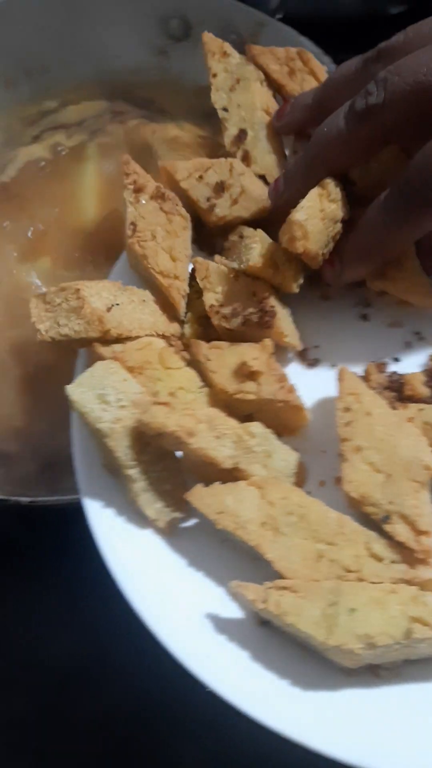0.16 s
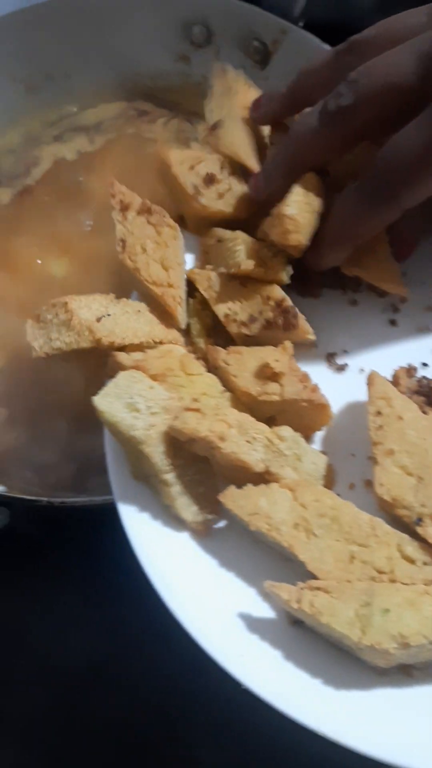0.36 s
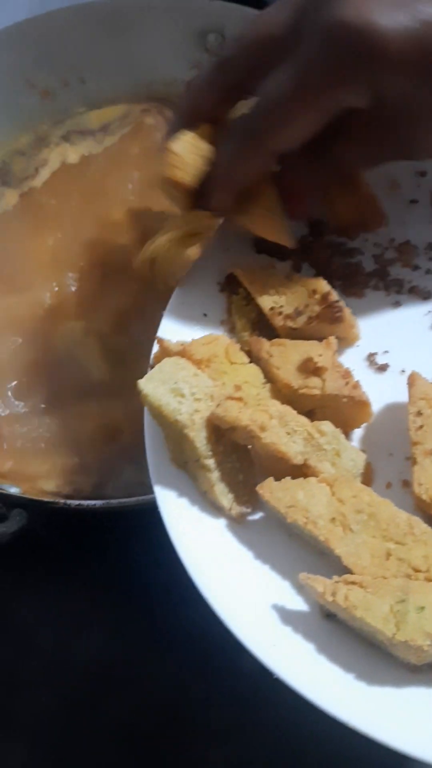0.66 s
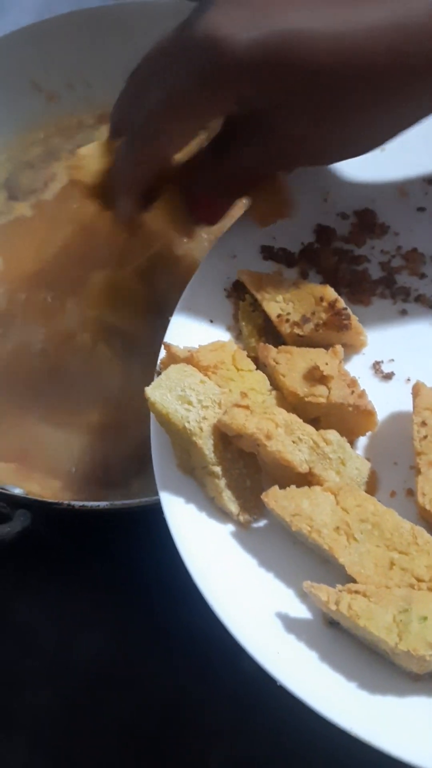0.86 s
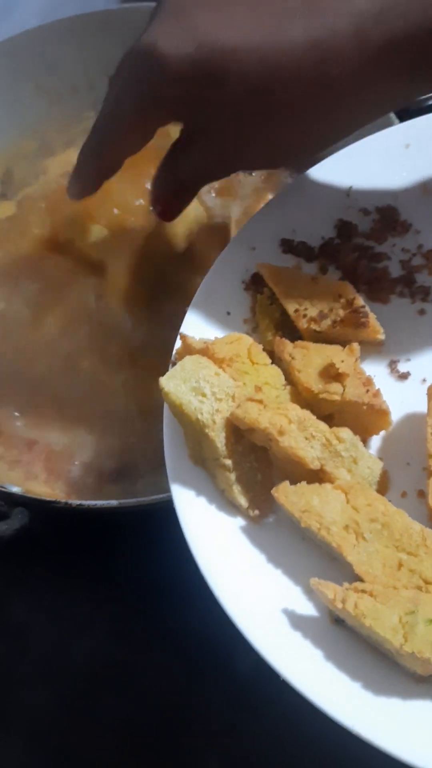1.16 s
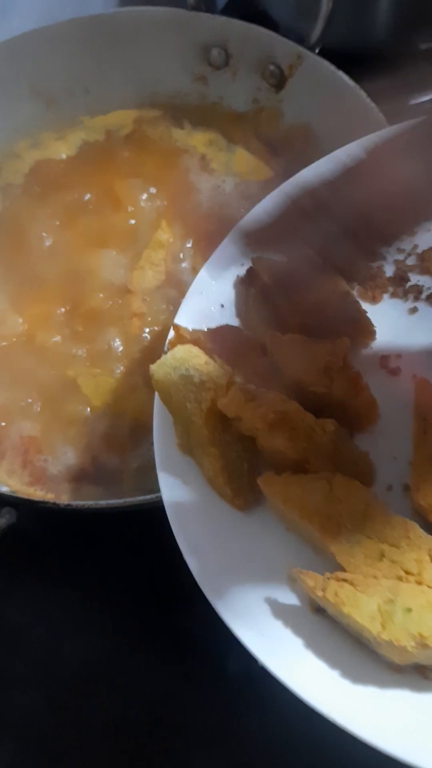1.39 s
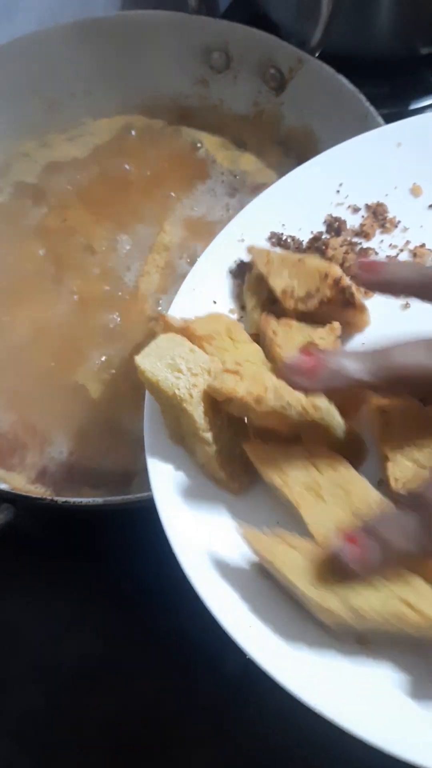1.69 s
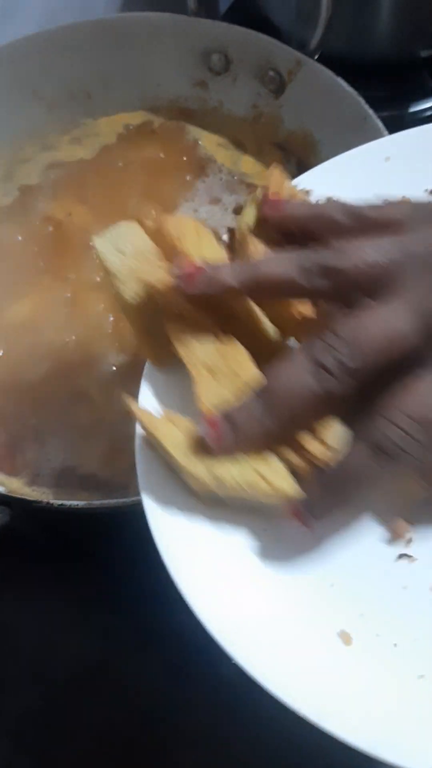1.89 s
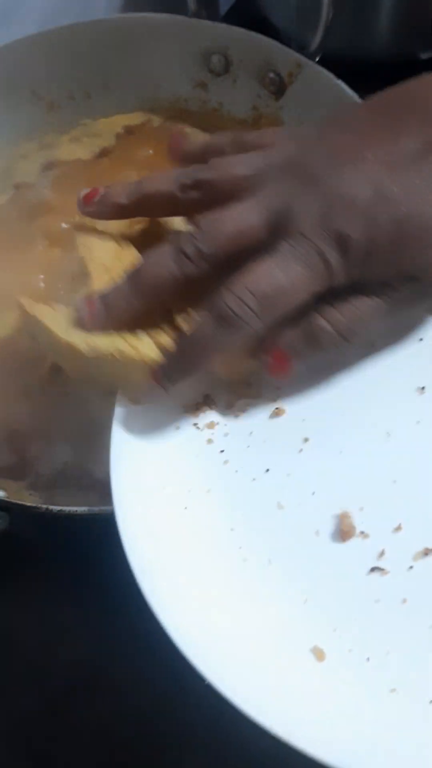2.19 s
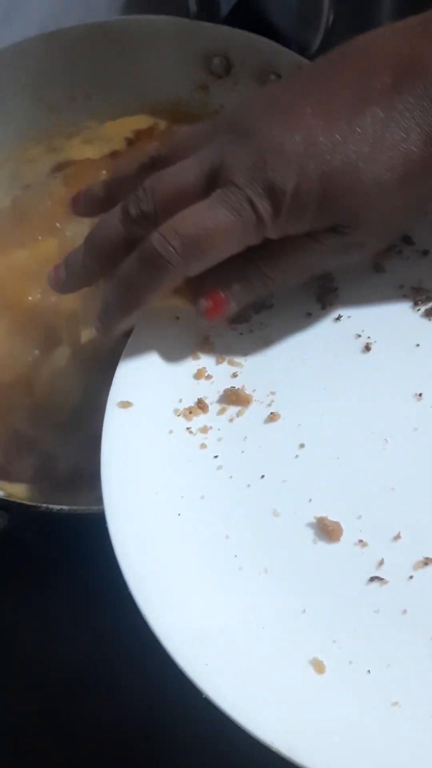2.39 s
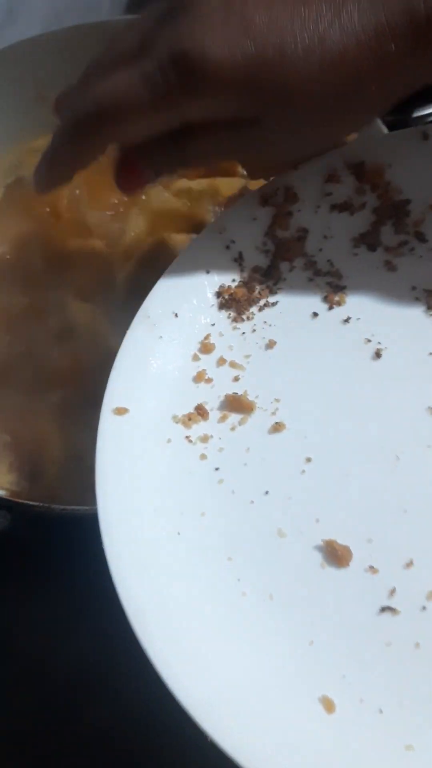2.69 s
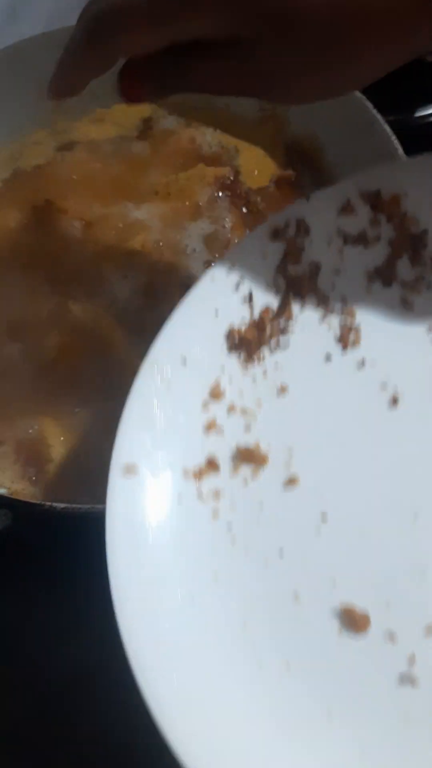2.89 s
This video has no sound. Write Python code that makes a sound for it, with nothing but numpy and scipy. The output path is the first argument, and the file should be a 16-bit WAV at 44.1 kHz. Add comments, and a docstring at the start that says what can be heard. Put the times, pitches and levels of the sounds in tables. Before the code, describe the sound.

Boiling gravy blubs and pops steadily while crusty pieces knock, scrape and plop in

```python
"""Thick gravy boils in a pan on a stove: big bubbles heave and small ones pop, each a damped tone rising in pitch.
Foam fizzes as stereo noise with crackles; the stove gives a low rumble of filtered noise.
Fried pieces pushed off a plate scrape and squeal (slips through plate resonances), knock on its rim (struck
resonances) and plop into the gravy (cavity tones, sprays of noise). Two close microphones, small hard room."""
import sys
import numpy as np
from scipy import signal
from scipy.fft import rfft, irfft, next_fast_len
from scipy.io import wavfile
from scipy.ndimage import map_coordinates

SR = 44100
rng = np.random.default_rng(int(sys.argv[2]) if len(sys.argv) > 2 else 0)


def bounce(signal):
    """Save signal as a 16-bit WAV file at the path given by the first command-line argument."""
    frames = np.transpose(np.atleast_2d(signal))
    limited = np.clip(frames, -1, 1)
    pcm = np.round(limited * 32767).astype(np.int16)
    wavfile.write(sys.argv[1], SR, pcm)


N = 134505

# Strength of the boil, drives large and small bubbles. Each row: time in seconds, relative level in dB.
BOIL_LEVEL = [(0.25, -49.5), (.5, -43), (1.25, -41), (1.5, -49.5), (2.1, -41), (2.4, -40), (2.7, -37.5),
              (3.05, -52.5)]
PAN_LEAD_S, PLATE_LEAD_S, SLIDE_LEAD_S = 0.00022, 0.00019, 0.00012  # left microphone ahead of right
PAN_LEAN_DB = 3  # left over right
STRUCK, RUBBED, BRUSHED = range(3)


def amp(db):
    """Decibels to gain."""
    return 10 ** (np.asarray(db) / 20)


def unit(x):
    """Scale to rms 1."""
    return x / np.sqrt(np.mean(x ** 2) + 1e-20)


def along(points, hz):
    """Interpolate (Hz, value) points on a log frequency axis."""
    point_hz, values = np.transpose(points)
    return np.interp(np.log(hz + 1), np.log(point_hz + 1), values)


def level(rows):
    """Gain per sample from (seconds, dB) rows."""
    return amp(np.interp(np.arange(N) / SR, *np.transpose(rows)))


def filtered(x, response):
    """Apply a complex frequency response, zero-padded."""
    n = x.shape[-1]
    padded = next_fast_len(n + SR // 4)
    spectrum = rfft(x, padded) * response(np.fft.rfftfreq(padded, 1 / SR))
    return irfft(spectrum, padded)[..., :n]


def low_pass(f, corner_hz):
    """Second-order low-pass response, Q of 1."""
    return 1 / (1 + 1j * f / corner_hz - (f / corner_hz) ** 2)


def add(track, start_s, sound):
    """Mix a sound into a track, cut at the track's end."""
    part = track[..., max(0, round(start_s * SR)):][..., :sound.shape[-1]]
    part += sound[..., :part.shape[-1]]


def wobble(knots_per_s):
    """Smooth random curve: spline through normal random knots."""
    knots = rng.standard_normal(int(N * knots_per_s / SR) + 2)
    return map_coordinates(knots, [np.arange(N) * knots_per_s / SR])


def bubble(t, hz, cycles, rise, onset):
    """Damped cavity tone: down 60 dB after `cycles`, pitch then up by the fraction `rise`; onset in cycles."""
    age = t * hz
    tone = np.sin(2 * np.pi * age * (1 + rise * age / cycles / 2))
    return tone * amp(-60 * age / cycles) * (1 - np.exp(-age / onset))


def swarm(per_s, hz, spread, cycles, rise, scatter_db, samples):
    """Bubble grains at random times, pitches (log spread) and exponentially scattered dB levels, rms 1."""
    u = rng.random((int(per_s * N / SR), 4))
    pitch_hz = np.minimum(hz * np.exp(spread * (u[:, 1:2] + u[:, 2:3] - 1)), SR / 3)
    strength = amp(-scatter_db * np.log(np.maximum(u[:, 3:], np.exp(-4))))
    grains = strength * bubble(np.arange(samples) / SR, pitch_hz, cycles, rise, onset=0.2)
    where = (u[:, :1] * N).astype(int) + np.arange(samples)
    return unit(np.bincount(where.ravel(), grains.ravel(), N)[:N])


def placed(x, lead_s, lean_db, room_db):
    """Mono source to two microphones: direct sound with a time lead, plus a decaying noise tail as the room."""
    # Room decay. Each row: frequency in Hz, time to fall 60 dB in seconds.
    decay_s = [(1000, 0.16), (10000, 0.02)]
    hz, t, noise = signal.stft(rng.standard_normal((2, SR // 3)), SR, nperseg=256)
    fade = amp(-60 * t / along(decay_s, hz)[:, None])
    tail = signal.istft(noise * fade, SR, nperseg=256)[1]
    tail = tail / np.linalg.norm(tail[0])
    delayed = np.pad(x, (SR // 256, 0))[None]  # about 4 ms
    wet = signal.fftconvolve(delayed, tail, axes=1)[:, :N]
    sides = np.array([[1], [-1]])
    direct = filtered(x, lambda f: np.exp(1j * np.pi * f * lead_s * sides))
    return (direct + amp(room_db) * wet) * amp(lean_db * sides / 2)


def stove(gain_db=-1):
    """Low rumble under the pan: noise with a bass-heavy spectrum and a moving level."""
    # Rumble spectrum. Each row: frequency in Hz, gain in dB.
    rumble_shape = [(28, -73), (50, -16.5), (62, 4.5), (110, -10), (140, -5.5), (300, -21.5), (2000, -50.5)]
    # Rumble envelope. Each row: time in seconds, relative level in dB.
    rumble_level = [(2.42, -45), (2.54, -38), (2.66, -42), (2.78, -39), (2.88, -44)]
    noise = unit(filtered(rng.standard_normal(N), lambda f: amp(along(rumble_shape, f))))
    return placed(amp(gain_db) * level(rumble_level) * noise, PAN_LEAD_S, lean_db=2.0, room_db=-46)


def plate(f, touch):
    """Plate response: parallel band-pass resonances, weighted by the kind of touch."""
    # Plate modes. Each row: centre in Hz, width in Hz, gain in dB when struck, when rubbed, when brushed.
    modes = [(674, 88, 7.5, -12, -2), (1026, 67, 7.5, -23, -21), (1140, 86, -5, 1.5, -8),
             (1440, 77, -9, -9, -20), (1930, 23, 23, 10.5, -3), (2230, 120, -1, -25, -1),
             (3000, 106, 10, 0.5, 0.5), (3400, 44, -4, 7.5, 2)]
    return sum(amp(db[touch]) * 1j * f * width_hz / (hz * hz - f * f + 1j * f * width_hz)
               for hz, width_hz, *db in modes)


def slide(grit_hz=3000, squeal_hz=1938, waver_hz=14, squeal_db=-6.5):
    """Crusts catch and slip: slips excite the plate, the long slide squeals, light strokes add grit."""
    # The long slide. Each row: time in seconds, relative level in dB.
    slide_level = [(1.58, -67), (1.7, -41), (1.79, -44), (1.92, -51.5), (2.05, -55), (2.13, -44.5),
                   (2.19, -66)]
    # Light strokes. Each row: middle in seconds, half length (to 1/e) in seconds, relative level in dB.
    stroke_rows = [(0.566, 0.079, -49.5), (1.943, 0.081, -50.5), (2.268, 0.26, -52)]
    slips = swarm(per_s=3500, hz=3300, spread=0.46, cycles=1, rise=0, scatter_db=2.0, samples=96)
    ring = unit(filtered(slips, lambda f: plate(f, RUBBED)))
    brush = unit(filtered(slips, lambda f: plate(f, BRUSHED)))
    grit = unit(filtered(slips, lambda f: 1j * f / (1 + 1j * f / grit_hz) ** 2))
    grip = wobble(knots_per_s=50)  # moves squeal pitch and level together
    phase = 2 * np.pi * np.cumsum(squeal_hz + waver_hz * grip) / SR
    squeal = unit(np.sin(phase) * amp(2 * grip))
    t = np.arange(N) / SR
    strokes = sum(amp(db) * np.exp(-((t - middle_s) / half_s) ** 2) for middle_s, half_s, db in stroke_rows)
    x = level(slide_level) * (ring + amp(squeal_db) * squeal) + strokes * (grit + brush)
    return placed(x, SLIDE_LEAD_S, lean_db=2, room_db=-4.5)


def knocks(soft_hz=2600, thud_db=-5, thud_hz=900, crumble_s=0.003, crumble=0.06):
    """A crusty piece hits the plate: an impulse and brief crumbling noise drive a dull thud and a short ring."""
    # Each row: start in seconds, relative level in dB.
    knock_rows = [(0.353, -24), (.791, -42), (.982, -25), (2.0865, -17), (2.0893, -20), (2.092, -15)]
    x, t = np.zeros(N), np.arange(SR // 5) / SR

    def struck_plate(f):
        thud = amp(thud_db) * 1j * f / thud_hz * low_pass(f, thud_hz)
        return (plate(f, STRUCK) + thud) * low_pass(f, soft_hz)

    for start_s, db in knock_rows:
        push = (t == 0) + crumble * rng.standard_normal(len(t)) * np.exp(-t / crumble_s)
        clack = filtered(push, struck_plate)
        add(x, start_s, amp(db) * clack / np.abs(clack).max())
    return placed(x, PLATE_LEAD_S, PAN_LEAN_DB, room_db=-9)


def splats(attack_s=0.00017, low_hz=450, drops_per_s=5000):
    """Droplets and crumbs as foam bursts and pieces land or break: sparse random impulses, band-limited."""
    # Each row: start in seconds, relative level in dB, fade time (to 1/e) in seconds, treble corner in Hz.
    splat_rows = [(0.147, -40.5, 0.014, 9200), (.338, -47.5, 0.05, 1700), (0.984, -42, 0.022, 1700),
                  (1.12, -40, 0.01, 8000), (1.153, -45, 0.02, 3000), (1.894, -35, 0.0065, 4100),
                  (1.948, -33.5, 0.0088, 6100), (2.603, -40, 0.021, 1990), (2.769, -34.5, 0.0053, 3000),
                  (2.772, -39.5, 0.0068, 4630)]
    x, t = np.zeros(N), np.arange(SR // 6) / SR
    for start_s, db, fade_s, corner_hz in splat_rows:
        drops = rng.standard_normal(len(t)) * (rng.random(len(t)) < drops_per_s / SR)
        spray = unit(filtered(drops, lambda f: 1j * f / (low_hz + 1j * f) * low_pass(f, corner_hz)))
        envelope = (1 - np.exp(-t / attack_s)) * np.exp(-(t / fade_s) ** 2)
        add(x, start_s, amp(db) * spray * envelope)
    return placed(x, PLATE_LEAD_S, PAN_LEAN_DB, room_db=-3)


def fizz(gain_db=4.5, crackle_db=-8, echo_db=-5, echo_s=0.015):
    """Foam: hiss of countless tiny bursts plus nearer crackles, coloured by decaying echoes inside the pan."""
    # Foam envelope. Each row: time in seconds, relative level in dB.
    foam_level = [(.3, -47.5), (.6, -45), (1.5, -46.5), (2, -43.5), (2.65, -44.5), (3.05, -48)]
    # Foam spectrum. Each row: frequency in Hz, gain in dB.
    foam_shape = [(760, -2), (1300, -9.5), (1500, -9.5), (1930, -0.5), (3560, -3.5), (4720, 1),
                  (7150, -0.5), (11200, -7.5), (13800, -1.5), (15600, -6)]
    # Stereo balance. Each row: frequency in Hz, left over right in dB.
    foam_lean = [(3300, -0.5), (9800, 3), (14000, 12.5)]
    crackle = np.array([swarm(per_s=1500, hz=8000, spread=0.91, cycles=3.8, rise=0, scatter_db=3.5, samples=64)
                        for _ in range(2)])
    pair = rng.standard_normal((2, N)) + amp(crackle_db) * crackle
    t = np.arange(SR // 20) / SR
    walls = rng.standard_normal((2, len(t))) * np.exp(-t / echo_s)
    walls = walls / np.linalg.norm(walls[0])
    pair = pair + amp(echo_db) * signal.fftconvolve(pair, walls, axes=1)[:, :N]

    def colour(f):
        left = amp(along(foam_lean, f))
        balance = np.array([left, np.ones_like(f)]) / np.hypot(1, left)
        return amp(along(foam_shape, f)) * balance

    return amp(gain_db) * level(foam_level) * unit(filtered(pair, colour))


def pops(small_db=-11, overtone_db=-11, overtone_ratio=1.5):
    """Small bubbles popping and cavities opened by falling pieces: short rising tones with an overtone."""
    # Plops. Each row: start in seconds, relative level in dB, starting pitch in Hz.
    plop_rows = [(0.354, -20, 797), (0.41, -35.5, 664), (0.451, -28.5, 920), (0.79, -31, 764),
                 (0.855, -33, 720), (0.916, -34, 586), (1.005, -29, 620), (1.228, -29.5, 800),
                 (2.257, -31, 650), (2.325, -33.5, 650), (2.359, -30.5, 850), (2.477, -32.5, 655),
                 (2.625, -34.5, 660), (2.66, -33.5, 720), (2.705, -35.5, 537), (2.778, -22, 1680)]
    small = swarm(per_s=110, hz=712, spread=1.127, cycles=13.0, rise=0.065, scatter_db=4.5, samples=2000)
    x = amp(small_db) * level(BOIL_LEVEL) * small
    t = np.arange(SR // 12) / SR
    for start_s, db, hz in plop_rows:
        pitches_hz = hz * np.array([[1], [overtone_ratio]])
        main, overtone = bubble(t, pitches_hz, cycles=15, rise=0.038, onset=0.061)
        add(x, start_s, amp(db) * (main + amp(overtone_db) * overtone))
    return placed(x, PAN_LEAD_S, PAN_LEAN_DB, room_db=-8)


def boil(churn_db=-4, blub_db=3, overtone_db=-8, overtone_ratio=1.665):
    """Large slow bubbles in thick gravy: a low swarm plus single heaves, each with a weaker upper tone."""
    # Big bubbles. Each row: start in seconds, relative level in dB, starting pitch in Hz.
    blub_rows = [(0.456, -28.5, 264), (0.622, -30.5, 231), (0.933, -25, 163), (1.157, -24.5, 175),
                 (1.364, -30.5, 175), (1.723, -26.5, 217), (1.892, -30.5, 258), (1.989, -29, 172),
                 (2.236, -26.5, 179), (2.265, -28, 280), (2.407, -22.5, 174), (2.685, -30.5, 275),
                 (2.937, -29, 166)]
    churn = swarm(per_s=85, hz=185.4, spread=0.755, cycles=9.4, rise=0.065, scatter_db=0.5, samples=4000)
    x = amp(churn_db) * level(BOIL_LEVEL) * churn
    t = np.arange(SR // 6) / SR
    for start_s, db, hz in blub_rows:
        pitches_hz = hz * np.array([[1], [overtone_ratio]])
        main, overtone = bubble(t, pitches_hz, cycles=9.7, rise=0.016, onset=0.48)
        add(x, start_s, amp(db + blub_db) * (main + amp(overtone_db) * overtone))
    return placed(x, PAN_LEAD_S, lean_db=-0.5, room_db=-15.0)


def scene():
    """Sum of all sources at the pan."""
    return stove() + slide() + knocks() + splats() + fizz() + pops() + boil()


def record(dry, low_cut_hz=40, top_hz=15850):
    """Second-order cut of the deepest bass, nothing kept above the band limit."""
    high_pass = lambda f: (1j * f / low_cut_hz) ** 2 * low_pass(f, low_cut_hz)
    return filtered(dry, lambda f: high_pass(f) * (f < top_hz))


dry = scene()
out = record(dry)
bounce(out)
```